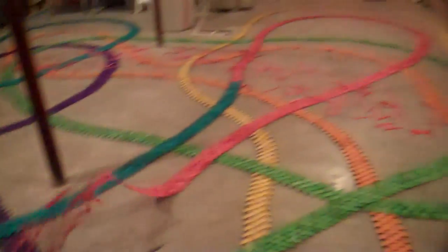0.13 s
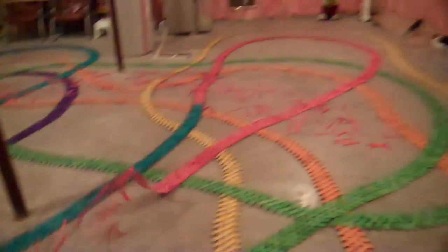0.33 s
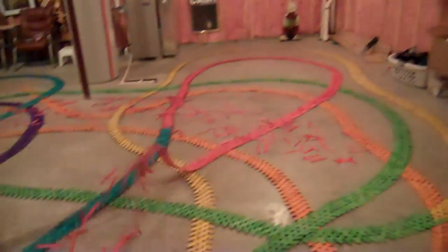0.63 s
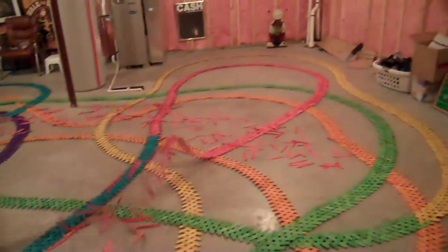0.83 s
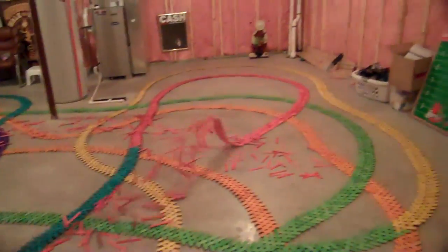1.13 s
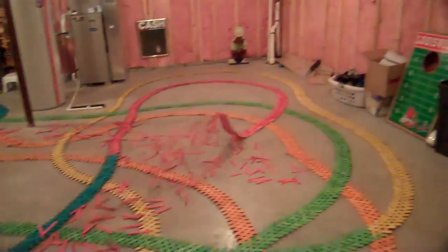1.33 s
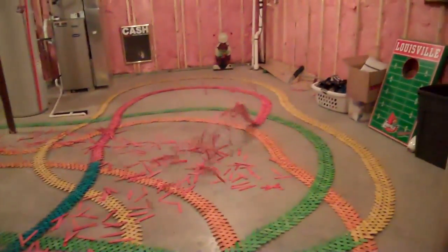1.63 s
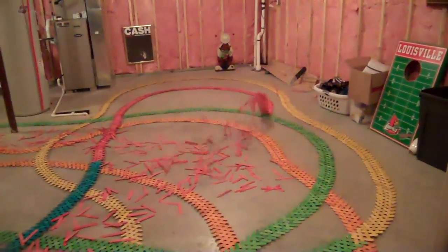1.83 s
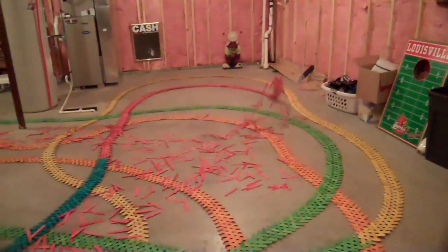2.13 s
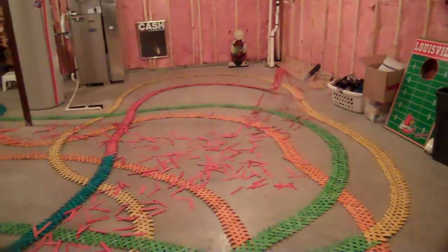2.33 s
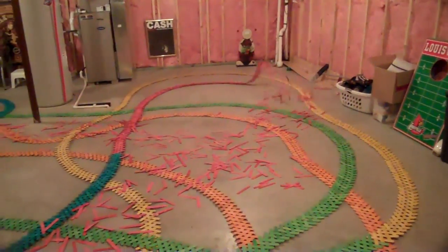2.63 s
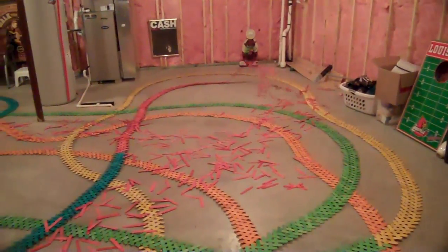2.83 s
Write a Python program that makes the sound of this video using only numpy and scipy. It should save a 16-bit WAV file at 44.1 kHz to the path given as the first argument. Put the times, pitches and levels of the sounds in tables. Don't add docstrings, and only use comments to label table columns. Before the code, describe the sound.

Thin wooden sticks clatter nonstop onto concrete, a dense, crisp rain of dry cracks with tiny high rings. Close hits and chatter stand out throughout, with swells near 0.3, 0.7 and 1.5 seconds, and the hardest crack, overloading the microphone, near 2.4. The clatter continues to the end at 3 seconds. Hard basement walls echo briefly over faint low hum; left is bright, right duller.

```python
import sys
import numpy as np
from scipy import signal
from scipy.fft import rfft, irfft
from scipy.io import wavfile

SR = 44100
rng = np.random.default_rng(int(sys.argv[2]) if len(sys.argv) > 2 else 0)


def transcribe(u):
    v = np.clip(np.atleast_2d(u).T, -1, 1)
    q = np.round(v * 32767).astype(np.int16)
    wavfile.write(sys.argv[1], SR, q)


def to_linear_factor(level_db):
    exponent = np.asarray(level_db, float) / 20
    return 10 ** exponent


N = 130977

# (frequency [Hz], density [dB per Hz])
AIR_SPECTRUM = [(25, -23), (60, -14.5), (120, -5.5), (160, -2.5), (230, 2), (360, -1.5), (520, -7.5),
                (900, -3)]
# (frequency [Hz], level [dB rms])
HUM_TONES = [
    (118.4, -57),
    (220.7, -55.5),
]
# (time [s], peak [dB])
OVERLOAD_TICKS = [
    (0.6951, -7),
    (2.3774, -5),
    (2.3786, -4),
    (2.3812, -6),
    (2.588, -10),
]
# (frequency [Hz], gain [dB])
LEFT_PORT_COLOUR = [(540, -26), (1300, -22.5), (4000, -8), (6000, -4), (7500, 5), (9800, -5.5),
                    (12000, -8.5), (14100, -10.5)]
RIGHT_PORT_COLOUR = [(540, -31.5), (1300, -21.5), (4000, -8.5), (6100, 2.5), (7800, -9.5), (10000, -15),
                     (12000, -39), (14000, -43)]
# (time [s], level [dB], left over right [dB])
RAIN_COURSE = [(0.0, -25, 26.5), (0.06, -26.5, -10.5), (0.16, -18, 0.5), (0.3, -29, -5),
               (0.32, -13.5, -3.5), (0.35, -23.5, -5.5), (0.7, -14.5, 0.5), (0.76, -19.5, -2),
               (1.1, -19, -0.5), (1.22, -24, -1.5), (1.45, -13, 0.5), (1.5, -24, -7), (1.57, -20, 1.0),
               (2.2, -18.5, -1.5), (2.39, -14, 4.5), (2.41, -19.5, -1), (2.83, -15, -1), (2.97, -22, 2)]
# (time [s], strength [dB], a lull below -10.5)
TOUCH_FLURRIES = [(0.0887, -13), (0.1575, -19), (0.3082, -16), (0.382, -10), (0.6704, -12), (0.904, -45),
                  (0.9628, -7), (1.0565, -6), (1.106, -2.5), (1.2235, 1.5), (1.322, -17), (1.4326, -15.5),
                  (1.5609, 10), (1.6237, -3), (1.706, -4), (1.811, -4), (1.9929, -9), (2.0842, -11),
                  (2.3306, -11), (2.3794, -47), (2.6559, -17), (2.744, -5), (2.7906, -20), (2.8784, -2.5)]
# (time [s], peak [dB], ring [Hz])
FREE_RINGERS = [(0.5394, -11, 5040), (0.5694, -14, 4170), (0.9428, -11, 5460), (0.9617, -13, 4230),
                (0.9976, -10, 5480), (1.0894, -9, 5720), (1.1394, -13, 5760), (1.3558, -12, 4100),
                (1.6038, -7, 5490), (1.711, -10, 4390), (2.3494, -14, 5690), (2.4694, -15, 5470),
                (2.4894, -13, 4000), (2.5244, -14, 4130), (2.5894, -15, 4160), (2.7332, -10, 4010),
                (2.7594, -11, 4910), (2.7994, -10, 5000), (2.8994, -14, 5460)]
# (time [s], peak [dB], ring [Hz])
NEAR_LANDINGS = [(0.0034, -7, 7340), (0.0887, -6, 5160), (0.1575, -6, 5920), (0.3082, -8, 5640),
                 (0.3187, -8, 4070), (0.382, -11, 5870), (0.4504, -6, 5240), (0.4574, -6, 4560),
                 (0.6484, -6, 5920), (0.6704, -1, 7720), (0.9043, -4, 4160), (0.9428, -7, 5460),
                 (1.0705, -3, 6410), (1.1049, -4, 4180), (1.2231, -7, 5950), (1.3214, -6, 7470),
                 (1.4326, -3, 7260), (1.5404, -7, 6660), (1.5589, -6, 7240), (1.5864, -3, 6400),
                 (1.6234, -3, 5860), (1.706, -5, 7760), (1.8113, -7, 7320), (1.9929, -4, 5920),
                 (2.3775, 0, 6230), (2.4894, -7, 6830), (2.6559, -2, 7070), (2.7344, -6, 4010),
                 (2.7911, -3, 6170), (2.8789, -4, 5620)]

TIME_S = np.arange(N) / SR


def rms_one(x):
    return x / np.sqrt(np.mean(x ** 2) + 1e-20)


def drift(rate_hz):
    r = np.exp(-80 * np.pi * rate_hz / SR)
    noise = rng.standard_normal(N // 40 + 2002)
    slow = signal.lfilter([1], [1, -2 * r, r * r], noise)[2000:]
    return np.interp(np.arange(N) / 40, np.arange(len(slow)), rms_one(slow))


def first_order(x, kind, cut_hz):
    return signal.sosfilt(signal.butter(1, cut_hz, kind, fs=SR, output="sos"), x)


def colour(x, points):
    hz, db = np.transpose(points)
    bin_hz = np.arange(4097) * SR / 8192
    log_gain = np.log(to_linear_factor(np.interp(np.log(bin_hz + 1), np.log(hz), db)))
    fold = np.r_[1, 2 * np.ones(4095), 1, np.zeros(4095)]
    impulse = irfft(np.exp(rfft(irfft(log_gain) * fold)))
    return signal.fftconvolve(x, impulse)[:N]


def room_air():
    level_db, likeness, pan_db, rise_db_per_s = -47, 0.89, -3.5, 1.5
    hum_wobble_db = 2
    points = list(AIR_SPECTRUM) + [(2500, AIR_SPECTRUM[-1][1] - 25)]
    mid, side = [rms_one(colour(v, points)) for v in rng.standard_normal((2, N))]
    mid = np.sqrt((1 + likeness) / 2) * mid
    side = np.sqrt((1 - likeness) / 2) * side
    noise = to_linear_factor(level_db) * (mid + side * [[1], [-1]])
    hum = np.zeros(N)
    for hz, db in HUM_TONES:
        level = to_linear_factor(db + 4.5 + hum_wobble_db * drift(1.3))
        hum += level * np.sin(2 * np.pi * hz * TIME_S + .5 * drift(1.4))
    pan = np.array([[pan_db / 2], [-pan_db / 2]])
    return (noise + hum) * to_linear_factor(rise_db_per_s * (TIME_S - 1.5) + pan)


def overload_ticks():
    kicks = np.zeros(N)
    for s, db in OVERLOAD_TICKS:
        kicks[int(s * SR)] = -to_linear_factor(db) * 6
    return first_order(kicks, "low", 1800) * [[1], [0]]


def room_echo(x):
    t60_s, gap_s, alike_below_hz, wall_cut_hz = 0.61, .003, 2400, 7000
    t = np.arange(SR // 2) / SR
    shared, *own = rng.standard_normal((3, SR // 2)) * to_linear_factor(-60 * t / t60_s) * (t > gap_s)
    tails = first_order(shared, "low", alike_below_hz) + first_order(np.array(own), "high", alike_below_hz)
    tails = first_order(tails, "low", wall_cut_hz)
    tails = tails / np.sqrt(np.sum(tails ** 2) / 2)
    return np.array([signal.fftconvolve(v, tail)[:N] for v, tail in zip(x, tails)])


def ring(clicks, hz, t60_s):
    r, w = to_linear_factor(-60 / (t60_s * SR)), 2 * np.pi * hz / SR
    return signal.lfilter([0, np.sin(w)], [1, -2 * r * np.cos(w), r * r], clicks + 1e-18)


def touches():
    touches_per_s, size_spread_db, rain_db = 1600, 1.5, -3.5
    clump_db, clump_hz = 2.18, 25.8
    flurry_share, flurry_s = 0.72, .02
    s, level_db, _ = np.transpose(RAIN_COURSE)
    swell_db = clump_db * drift(clump_hz)
    for at, db in TOUCH_FLURRIES:
        decay = np.exp(-np.maximum(TIME_S - at, 0) / flurry_s)
        swell_db += flurry_share * (db + 10.5) * decay * (TIME_S > at)
    sizes = to_linear_factor(size_spread_db * np.minimum(rng.exponential(1, N), 2.8)) * rng.choice([-1, 1], N)
    clicks = sizes * (rng.random(N) < touches_per_s / SR)
    return rms_one(clicks) * to_linear_factor(np.interp(TIME_S, s, level_db) + swell_db + rain_db)


def stick_rain():
    crack_db, ring_db, ring_cycles = -0.5, -13.5, 30
    bend_db, bend_hz, bend_t60_s = -25, 4150, .025
    patch_db, patch_hz, port_lag_s = 2.5, 7, .00006
    clicks = touches()
    direction = rng.integers(0, 16, N)
    lags = np.round(rng.permutation(np.linspace(-1, 1, 16)) * port_lag_s * SR)
    out = np.zeros((4, 2, N))
    for k, hz in enumerate(np.geomspace(3500, 9500, 16)):
        mine = clicks * (direction == k) * to_linear_factor(patch_db * drift(patch_hz) - 3)
        sound = to_linear_factor(crack_db) * mine + to_linear_factor(ring_db) * ring(mine, hz, ring_cycles / hz)
        if k % 4 == 0:
            sound = sound + to_linear_factor(bend_db) * ring(mine, bend_hz * (1 + 0.01 * (k - 6)), bend_t60_s)
        out[k // 2 % 4] += [sound, np.roll(sound, int(lags[k]))]
    s, _, pan_db = np.transpose(RAIN_COURSE)
    pan = np.interp(TIME_S, s, pan_db - pan_db.mean()) / 2
    return out * to_linear_factor(np.array([pan, -pan]))


def near_landings():
    landing_db, ring_db, ring_t60_s = 11, -23, .012
    bounce_s, bounce_loss_db = .0012, 6
    free_db, free_t60_s = -9, .035
    span = 2000
    out = np.zeros(N + SR)
    for s, db, hz in NEAR_LANDINGS:
        chance = rng.random(4)
        at_s = np.cumsum(np.r_[0, bounce_s * (.3 + 1.4 * chance[:3])])
        clicks = np.zeros(span)
        bounces = to_linear_factor(db + landing_db - bounce_loss_db * np.arange(4))
        clicks[(at_s * SR).astype(int)] = bounces * np.sign(chance - .5)
        start = int(s * SR)
        out[start:start + span] += clicks + to_linear_factor(ring_db) * ring(clicks, hz, ring_t60_s)
    for s, db, hz in FREE_RINGERS:
        start = int(s * SR)
        out[start:start + span] += to_linear_factor(db + free_db) * ring(np.arange(span) == 0, hz, free_t60_s)
    return out[:N]


def ports(left, right):
    top = .82
    x = to_linear_factor(8.5) * np.array([colour(left, LEFT_PORT_COLOUR), colour(right, RIGHT_PORT_COLOUR)])
    x = top * x / (top ** 4 + x ** 4) ** (1 / 4)
    return signal.sosfilt(signal.butter(2, 130, "high", fs=SR, output="sos"), x)


def scene():
    echo_db = -3
    sticks = stick_rain() + near_landings() / 4
    left, right = sum(part + to_linear_factor(echo_db) * room_echo(part) for part in sticks)
    return ports(left, right) + room_air() + overload_ticks()


def treble_holes(x):
    from_hz, share, more_per_khz = 9300, .15, .16
    hz, _, z = signal.stft(x, SR, nperseg=1024)
    luck = rng.random((40, z.shape[1] // 2 + 1))
    luck = np.repeat(np.repeat(luck, 13, axis=0), 2, axis=1)
    luck = luck[:len(hz), :z.shape[1]]
    lost = (hz > from_hz) * (share + more_per_khz * (hz - from_hz) / 1000)
    return signal.istft(z * (luck > lost[:, None]), SR, nperseg=1024)[1][:N]


def low_pass(x):
    return signal.sosfilt(signal.butter(12, 15480, fs=SR, output="sos"), x)


def record(dry):
    mix = signal.sosfilt(signal.ellip(12, .5, 70, 14150, fs=SR, output="sos"), dry)
    mix[1] = treble_holes(mix[1])
    return low_pass(mix)


dry = scene()
out = record(dry)
transcribe(out)
```